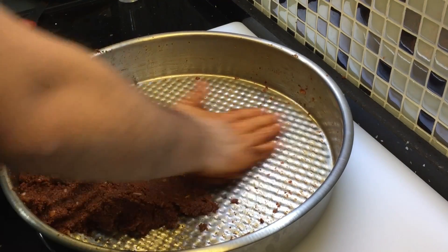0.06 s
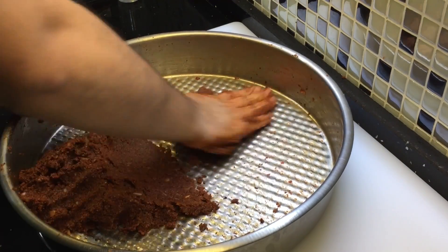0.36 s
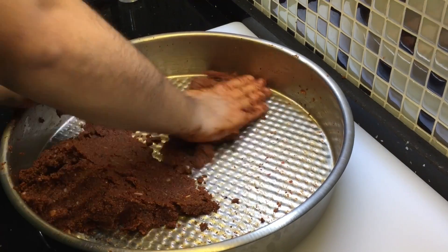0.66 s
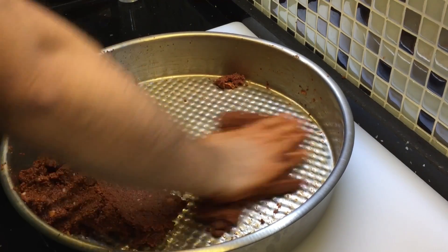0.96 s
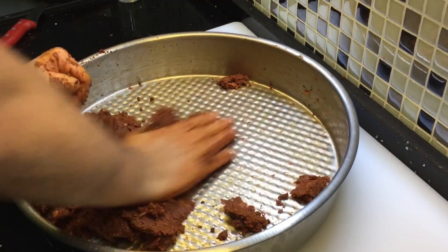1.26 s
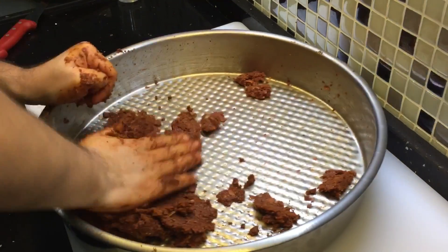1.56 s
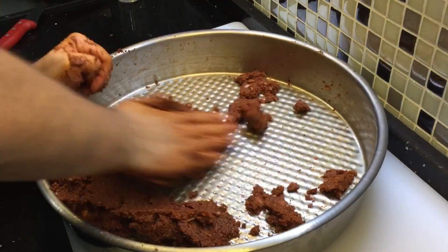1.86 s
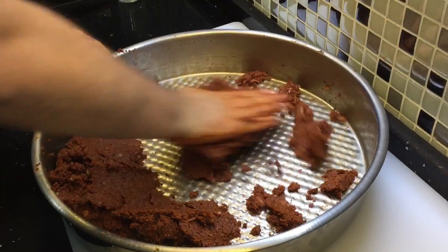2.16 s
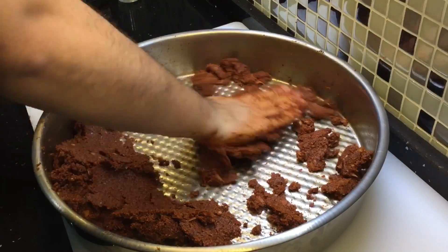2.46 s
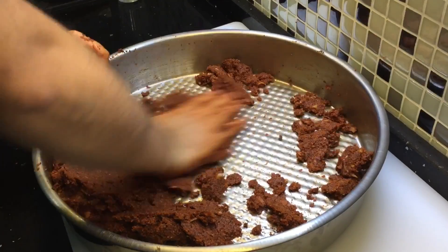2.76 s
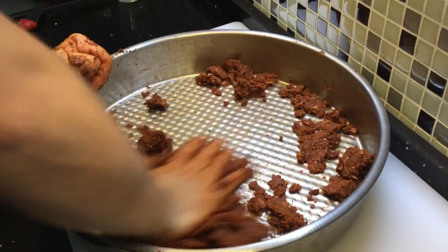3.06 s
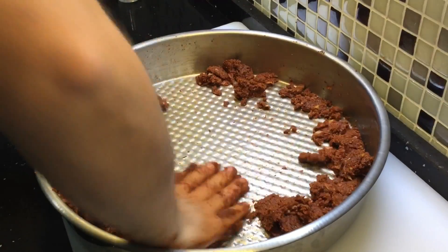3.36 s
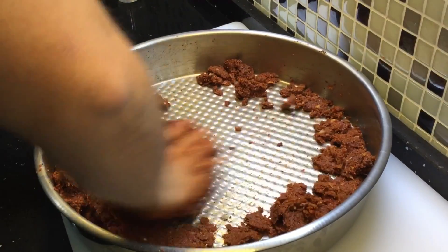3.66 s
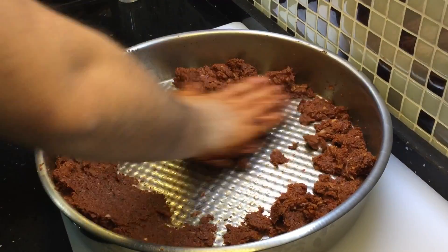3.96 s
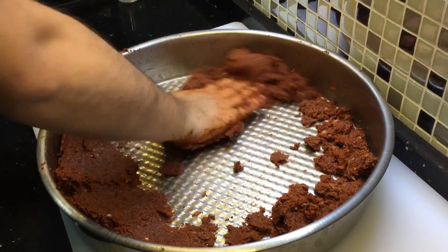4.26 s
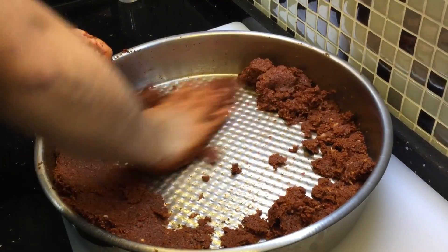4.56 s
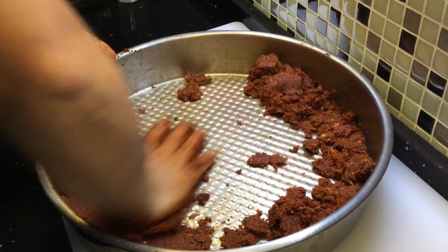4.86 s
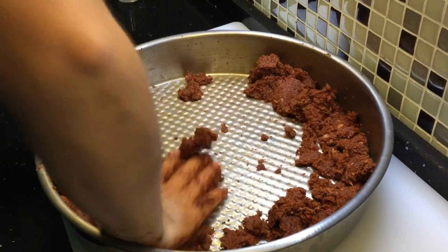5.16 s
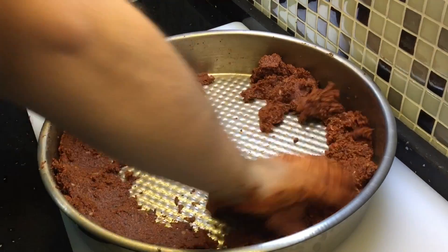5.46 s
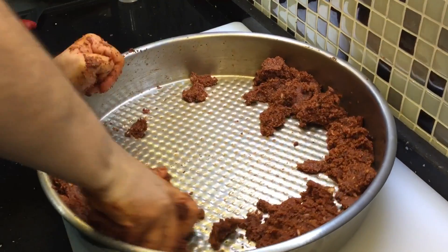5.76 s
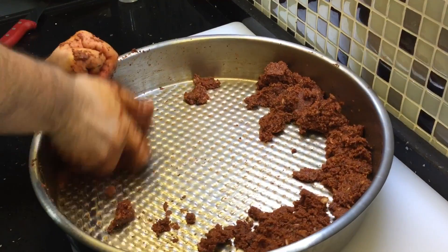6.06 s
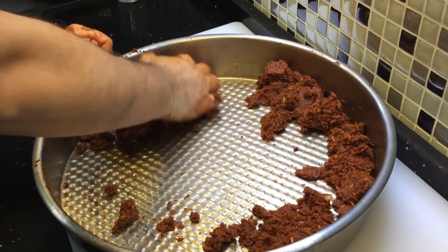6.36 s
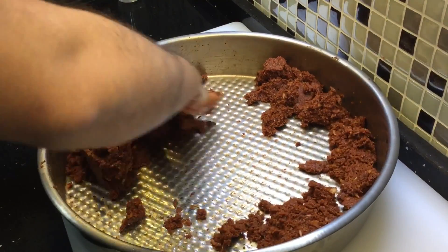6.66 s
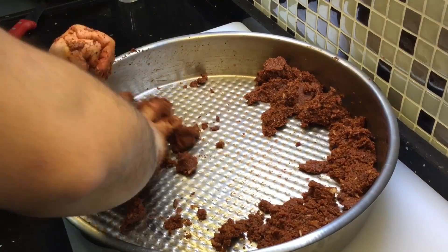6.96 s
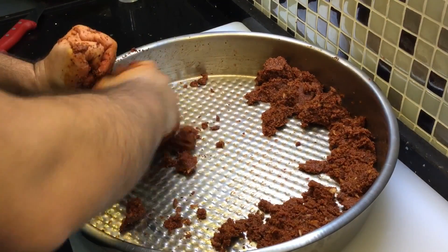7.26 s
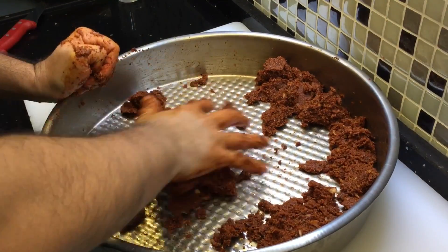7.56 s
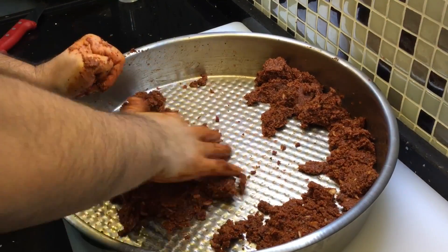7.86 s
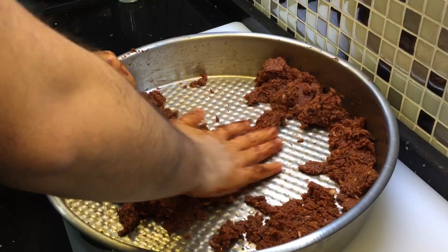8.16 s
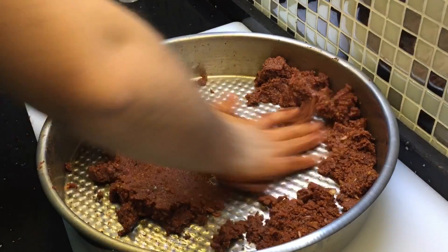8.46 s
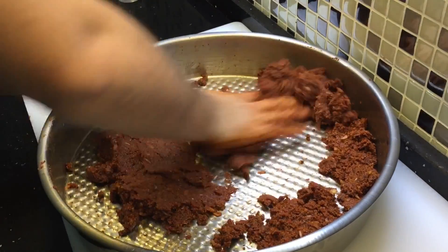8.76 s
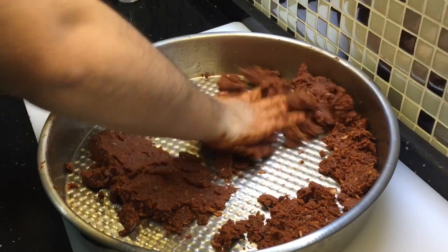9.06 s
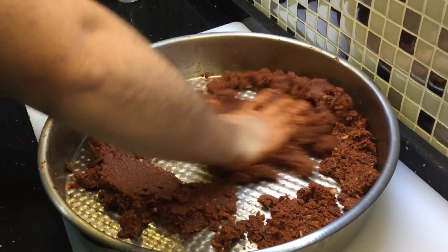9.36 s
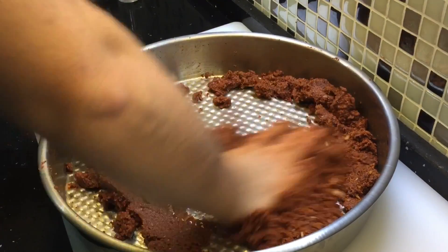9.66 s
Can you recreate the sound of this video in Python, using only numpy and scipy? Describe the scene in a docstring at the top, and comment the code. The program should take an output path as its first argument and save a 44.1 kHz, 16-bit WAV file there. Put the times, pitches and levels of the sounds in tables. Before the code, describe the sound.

A hand sweeps and presses a damp grain mixture around a metal pan, with gritty rubbing, dull thumps and moist smacks.

```python
"""A tiled kitchen, one microphone close to a wide, embossed metal pan on the counter.
A bare hand sweeps and presses a damp grain mixture round it: grains rasp and hiss over the dimples,
crumbs tick, and the pan floor drums under the palm. The hand lands with dull thumps; damp skin and
lumps smack and judder on the metal. Past the middle the sweeps turn light for a few seconds.
Behind the pan are a short ring off the tiles and faint room tone."""
import sys
import numpy as np
from scipy import signal
from scipy.fft import rfft, irfft, next_fast_len
from scipy.io import wavfile
from scipy.ndimage import uniform_filter1d

SR = 44100
rng = np.random.default_rng(int(sys.argv[2]) if len(sys.argv) > 2 else 0)


def inscribe(sig):
    """Save sig as 16-bit PCM at rate SR to the path in sys.argv[1].

    A 1-D sig is mono; a 2-D sig holds one channel per row.
    Samples are clipped to [-1, 1] before scaling.
    """
    pcm = np.round(np.clip(np.atleast_2d(sig).T, -1, 1) * 32767)
    wavfile.write(sys.argv[1], SR, pcm.astype(np.int16))


N = 427769
TIME = np.arange(N) / SR

# Event levels are ahead of each layer's own trim.
# sweeps of the hand: top speed t/s, rise/s, fall/s, rasp/dB, body/dB re rasp, hiss/dB re rasp,
# drumming/dB, rocking/dB, floor resonance under the palm f/Hz
SWEEPS = [(.002, .05, 0.038, -34.5, -11, -8.5, -40, -58, 114),
          (.07, 0.049, .08, -47.5, 1, -3, -46, -48, 112), (.325, 0.089, 0.14, -49, 1, 1, -47, -60, 120),
          (.44, 0.032, 0.041, -50, 4.5, 1.5, -55, -60, 123),
          (.667, .13, 0.22, -47, 0.5, -0.5, -44, -42.5, 126),
          (.81, 0.076, 0.12, -47.5, 2.5, -10, -39, -51, 127),
          (1.022, 0.18, 0.18, -46.5, 3, -2, -45.5, -41, 125),
          (1.368, 0.16, 0.17, -47.5, 4, -2, -47, -55, 119),
          (1.51, 0.076, 0.098, -50, 7, -11, -32.5, -48, 151),
          (1.763, 0.12, 0.15, -43.5, 4, -3.5, -44, -49, 130),
          (2.13, 0.15, 0.15, -45, 3, -2.5, -50, -45.5, 140),
          (2.48, 0.25, 0.13, -46.5, 3, -2, -43, -62, 125), (2.829, 0.19, .15, -45.5, 3, -2, -46, -53, 132),
          (3.193, 0.093, .11, -47.5, 2, -1, -47, -45, 142), (3.4, .06, .07, -61, -2, 3, -56, -55, 149),
          (3.546, 0.12, 0.15, -47.5, 1, -0.5, -55, -45, 147),
          (3.88, 0.11, 0.13, -45, 2, -1.5, -39, -45, 153),
          (4.245, 0.18, .125, -45.5, 5, -1.5, -43.5, -43.5, 152),
          (4.43, .06, 0.12, -53, 7, -1, -59, -58, 135), (4.594, 0.11, 0.13, -44.5, 5, -1.5, -42, -51, 121),
          (4.968, 0.17, 0.097, -46, 4.5, -1, -39.5, -47, 128),
          (5.33, 0.15, 0.11, -47.5, 6, -1, -47, -60, 135),
          (5.583, 0.095, 0.22, -58, -17, -7, -50, -60, 147), (5.84, .09, .09, -66, 5, -8, -45, -58, 161),
          (6.125, 0.12, 0.14, -58.5, 2.5, -7, -41.5, -67, 140),
          (6.271, 0.07, 0.062, -53.5, 13.5, 0, -42, -55, 185),
          (6.55, 0.085, 0.073, -56, 6.5, -19, -55, -56, 170),
          (7.097, 0.088, 0.18, -58, 3.5, -4, -76, -72, 162),
          (7.24, 0.064, .055, -58, -23, 1, -75, -77, 173),
          (7.515, 0.057, .135, -61, -11, -0.5, -54.5, -67, 155),
          (7.687, .06, .135, -56, 1.5, -2, -62, -57, 146),
          (7.815, .04, 0.071, -52.5, 5, 8.5, -61, -68, 138), (8.07, .03, 0.052, -70, 8, 3, -66, -70, 140),
          (8.168, 0.028, 0.029, -65.5, 8, 7.5, -66, -70, 150),
          (8.348, 0.081, 0.11, -47.5, 2.5, -0.5, -61, -39.5, 170),
          (8.478, 0.058, 0.063, -52.5, -10, 2.5, -54, -60, 160),
          (8.69, 0.1, 0.18, -47.5, 1, -1, -52, -43.5, 130),
          (9.024, 0.15, 0.13, -48, 2, -0.5, -49, -47, 135),
          (9.24, 0.081, 0.098, -59.5, -1, 4, -57, -49.5, 125),
          (9.358, 0.079, 0.15, -46, 4, -2, -47.5, -57, 129), (9.7, 0.12, .1, -46.5, 7, -3, -52, -59, 165)]
# light contact under and between the sweeps: t/s, rasp/dB, hiss/dB re rasp
LIGHT_CONTACT = [(0, -47.5, -11), (.2, -59, -14), (.53, -65, -10), (.8, -57.5, -3), (1.6, -54, -2.5),
                 (1.95, -62, -6), (2.62, -62, -4), (3.0, -53.5, -3), (3.7, -56.5, -4), (4.05, -59, -7),
                 (5.1, -54.5, -2), (5.8, -63, -2.5), (6.5, -59.5, 0), (6.8, -64, -6), (7.35, -73.5, 3.5),
                 (8.0, -72, -3.5), (8.6, -54.5, -12), (9.55, -71, -2)]
# the wall sings as the hand nears the rim: t/s, level/dB re rasp
RIM_SINGING = [(0, -22), (.7, -10), (1.1, -7), (1.8, -2.5), (2.4, -16), (2.9, -4), (3.4, -11), (4.0, -21),
               (5.2, -15), (6.0, -11), (9.7, -27)]
# the hand lands: t/s, level/dB, rocking/dB, hardness/dB, factor on the ringing time
LANDINGS = [(0.286, -31.5, -12, -12, 0.77), (0.461, -25.5, -24, -49, 0.62), (0.556, -32.5, -21, -8, 0.58),
            (0.742, -34, -12, -9, 1), (0.931, -31.5, -14, -21, 0.87), (0.999, -34, -21, -17, 0.62),
            (1.256, -22, -8, -14, 0.72), (1.483, -33, -32, -20, 1), (1.633, -25, -3, -12.5, 0.61),
            (2.352, -21, 0, -1, 0.51), (2.715, -26, -11, -10.5, 0.97), (3.074, -16, -32, -7, 0.77),
            (3.449, -30, -4, -8, 0.73), (3.729, -31.5, -11, -37, 0.87), (4.124, -25.5, -20, -15.5, 1),
            (4.464, -27.5, -8, -21, 1), (4.849, -28.5, -12, -14, 0.65), (5.208, -27.5, -4, -9.5, 0.55),
            (5.902, -35.5, -26, 8, 0.48), (6.284, -36, -17, -6.5, 1), (6.463, -35, -30, 13, 0.93),
            (7.137, -42.5, -24, 7, 0.99), (8.071, -34.5, 0, -0.5, 0.75), (8.29, -23, -11, -1, .95),
            (8.611, -30.5, -3, -28, 0.55), (8.931, -20.5, -9, -9, 0.67), (9.263, -34, 2, -11, 0.43),
            (9.593, -33, -11, -6.5, 0.85)]
# hand and lumps hit the metal: t/s, slap/dB, snap/dB, slap t60/s
SMACKS = [(0.269, -31.5, -59, 0.21), (0.46, -26, -34.5, 0.062), (0.767, -31.5, -50, 0.13),
          (1.125, -41, -34, 0.063), (1.252, -25, -30.5, 0.064), (1.626, -31.5, -42, 0.087),
          (1.768, -24.5, -50, 0.1), (2.352, -19, -27, 0.034), (2.710, -21, -51, 0.11),
          (4.114, -29.5, -34.5, 0.14), (4.126, -22, -39, 0.082), (4.391, -32, -55, 0.048),
          (4.449, -22, -29.5, 0.18), (4.848, -25, -53, 0.079), (5.665, -26.5, -37, 0.059),
          (6.053, -36, -61, 0.18), (6.294, -36, -46, 0.052), (6.422, -37, -36, 0.19),
          (6.473, -49, -40, 0.1), (6.573, -43, -43, 0.085), (6.717, -36, -62, 0.068),
          (7.138, -28, -47, 0.04), (7.492, -34, -40.5, 0.092), (7.572, -35.5, -57, 0.045),
          (8.07, -37.5, -61, 0.05), (8.291, -21, -36, 0.045), (8.609, -33, -48, 0.085),
          (8.927, -22.5, -44, 0.055), (9.584, -29, -55, 0.14)]
# skin or a lump catches on the metal: middle t/s, length/s, f/Hz, level/dB
CATCHES = [(.02, 0.093, 3400, -45), (.03, 0.065, 310, -44), (1.783, 0.072, 706, -38),
           (1.814, 0.078, 1530, -45), (2.361, 0.029, 336, -24.5), (2.492, 0.045, 405, -37.5),
           (3.093, 0.038, 500, -37.5), (3.327, .16, 1700, -56), (3.64, 0.023, 2800, -48),
           (3.917, 0.095, 526, -42), (4.811, .025, 9100, -48), (5.013, .06, 640, -46),
           (5.433, 0.017, 2240, -50), (5.623, 0.28, 4530, -55.5), (5.671, 0.018, 1110, -41.5),
           (6.23, 0.053, 520, -48), (6.289, 0.11, 204, -40), (6.428, 0.1, 4300, -50),
           (6.62, 0.05, 192, -44.5), (6.836, .05, 134, -45), (7.1, 0.099, 990, -56),
           (7.142, 0.028, 605, -47), (7.507, 0.047, 1200, -48), (7.584, 0.041, 1040, -49),
           (8.058, .025, 4140, -58), (8.935, 0.03, 313, -34.5), (8.515, 0.086, 990, -50),
           (9.046, 0.082, 484, -49)]

# modes of the pan, before the hand loads or damps them: f/Hz, level/dB, t60/s
FLOOR_MODES = [(103, -2, 0.14), (125.2, 8, 0.2), (167.4, 5, 0.15), (197.7, 1, 0.17), (237, -22, 0.13),
               (306, -12, 0.051), (351, -17, 0.061)]  # the floor under the mixture
WALL_MODES = [(537, -25.5, 0.14), (563, -9.5, 0.09), (625, 13, 0.028), (774, -4, 0.059), (968.5, 10, 0.053),
              (1081, -7, 0.046), (1330, -45, 0.043), (1563, 2.5, 0.07), (1710, 1.5, 0.071),
              (3435, 8.5, 0.073), (3680, -3, .06), (4630, -5, .02)]  # sheet and wall
ROCK_MODES = [(58.6, -36, 0.21), (69.2, -10, 0.36), (84, -33, 0.076)]  # the whole pan rocking

# spectra: f/Hz, level/dB
BODY_SPECTRUM = [(120, -44), (240, -3), (360, 0.5), (440, -5), (620, 1.5), (760, -3.5), (1000, 1),
                 (1250, -0.5), (1450, -8.5), (1750, -3.5), (2100, -16), (5000, -64)]  # grains pressed into the metal
RASP_SPECTRUM = [(400, -18), (1200, -5.5), (1700, 0.5), (2030, -5), (2400, 0.5), (2900, -2), (3500, -0.5),
                 (4500, 0.5), (5000, -3.5), (5800, -4), (7200, -15), (10000, -19), (16000, -38)]  # grains scraping the dimples
HISS_SPECTRUM = [(2000, -69), (5000, -7), (6800, 1.5), (7700, 3), (8800, 7.5), (9600, 6.5), (10500, 1.5),
                 (11300, 5), (13800, 5), (16000, 2)]  # loose grains
SLAP_SPECTRUM = [(150, -21.5), (300, 0), (600, -2), (1100, 0.5), (1500, -6.5), (2500, -15), (4300, -18),
                 (7000, -32), (16000, -33)]  # a lump flattening
SNAP_SPECTRUM = [(500, -6), (1500, -1), (2600, 1), (4500, 1), (6500, -7), (9000, -8), (16000, -19)]  # damp skin meeting metal
ROOM_TONE_SPECTRUM = [(25, -19), (55, 3), (170, -6), (260, -11), (600, -21.5), (1200, -25), (2500, -30),
                      (8000, -86), (16000, -25.5)]  # the still kitchen

# decay of the kitchen's reflections: f/Hz, t60/s
KITCHEN_DECAY = [(100, 0.66), (500, 0.44), (3000, 0.17), (14000, 0.11)]


def rubbing(rasp_db, body_db, hiss_db, rim_hz=1710):
    """Grains slip over the dimples in clumps; pressure couples them to the metal, loose ones hiss."""
    clumps, sticking = wander(rate_hz=24), wander(rate_hz=8.3)
    coarse, fine = slips(per_s=2500, spread_db=1), slips(per_s=9000, spread_db=-2)
    body = colour(pan_wall(coarse * gain_of(2 * sticking + clumps), ring_db=-21.5), BODY_SPECTRUM)
    scraping = (fine + 0.38 * coarse) * gain_of(1.3 * clumps)
    rasp = colour(pan_wall(scraping, ring_db=-18.5), RASP_SPECTRUM)
    loose = fine + slips(per_s=13000, spread_db=1.5)
    hiss = colour(loose * gain_of(1.03 * clumps), HISS_SPECTRUM)
    body = hand_damping(body, depth_db=3.2, across_hz=170, lasting_s=0.07) * gain_of(body_db - 1.96)
    rasp = hand_damping(rasp, depth_db=2.6, across_hz=300, lasting_s=0.05) * gain_of(rasp_db + 0.77)
    hiss = hand_damping(hiss, depth_db=2.3, across_hz=400, lasting_s=0.04) * gain_of(hiss_db + 1.9)
    rim_db = rasp_db + np.interp(TIME, *np.transpose(RIM_SINGING))
    rim = unit_rms(resonate(coarse, rim_hz, width_hz=170)) * gain_of(rim_db)
    return hand_lift() * (body + rasp + hiss + rim)


def hand_levels(arch_drop_db=21.5, arch_flatness=2.64):
    """Sweeps swell and fade with the hand's speed: rasp, body, hiss, drumming and rocking in dB."""
    t = TIME[::64]
    when, *columns = np.transpose(LIGHT_CONTACT)
    light_db, loose_db = (np.interp(t, when, column) for column in columns)
    power = gain_of([light_db + offset_db for offset_db in (0, 7, loose_db, 6, -5)]) ** 2
    for s, rise, fall, rasp_db, body_db, hiss_db, drum_db, rock_db, _ in SWEEPS:
        from_top = np.minimum(abs(t - s) / np.where(t < s, rise, fall), 3)
        top_db = np.array([rasp_db, rasp_db + body_db, rasp_db + hiss_db, drum_db, rock_db])[:, None]
        power += gain_of(top_db - arch_drop_db * from_top ** arch_flatness) ** 2
    return [np.interp(TIME, t, 10 * np.log10(layer)) for layer in power]


def hand_damping(x, depth_db, across_hz, lasting_s):
    """The moving hand damps and frees parts of the pan, so resonances come and go."""
    spectra = signal.stft(x, SR, nperseg=1024, noverlap=768)[2]
    bins, frames = round(across_hz * 1024 / SR), round(lasting_s * SR / 256)
    patches = uniform_filter1d(rng.standard_normal(spectra.shape), bins, axis=0)
    patches = unit_rms(uniform_filter1d(patches, frames, axis=1))
    spectra *= gain_of(depth_db * patches)
    return unit_rms(signal.istft(spectra, SR, nperseg=1024, noverlap=768)[1][:N])


def hand_lift(dip_db=2.5, lift_s=0.035):
    """Just before each smack the hand leaves the metal, so the rubbing's gain dips."""
    lifted = np.zeros(N)
    for s, *_ in SMACKS:
        corners = [s - lift_s, s - lift_s / 3, s - 0.003, s]
        lifted = np.maximum(lifted, np.interp(TIME, corners, [0, 1, 1, 0]))
    return gain_of(-dip_db * lifted)


def pan_wall(x, ring_db):
    """A contact reaches the microphone directly and through the ringing sheet metal."""
    sheet = ring(WALL_MODES).sum(0)
    return x + gain_of(ring_db) * signal.oaconvolve(x, sheet / np.linalg.norm(sheet))[:len(x)]


def thumps(contact_s=0.0035, rise_s=0.0066, loaded_pitch=0.96):
    """A soft blow swings the pan floor; a heavy one rocks the pan, a hard one wakes higher modes."""
    out, t = np.zeros(N), np.arange(SR // 2) / SR
    modes = np.array(ROCK_MODES + FLOOR_MODES)
    palm = np.hanning(round(contact_s * SR))  # the flesh spreads the blow
    for s, db, rock_db, hard_db, t60_factor in LANDINGS:
        blow = [(75, rock_db + 16), (120, 0), (185, hard_db + 12.5), (340, 0.63 * hard_db + 20.5)]
        weights = gain_of(value_at(blow, modes[:, 0]))
        ringing = ring(modes * [loaded_pitch, 1, t60_factor])  # the hand's weight lowers the pitch
        swing = -weights @ ringing * (1 - np.exp(-t / rise_s))
        swing = signal.oaconvolve(swing, palm)
        add(out, s, gain_of(db + 5) * swing / abs(swing).max())
    return out


def smacks(snap_t60=0.054, touch_s=0.0028, spread_s=0.001):
    """Damp skin snaps at first touch while the lump flattens with a duller burst of grains."""
    out, t = np.zeros(N), np.arange(SR // 4) / SR
    for s, slap_db, snap_db, slap_t60 in SMACKS:
        squash, wet = rng.standard_normal((2, len(t)))
        squash = squash * gain_of(-60 * t / slap_t60) * (1 - np.exp(-t / spread_s))
        slap = colour(pan_wall(squash, ring_db=-14.5), SLAP_SPECTRUM)
        snap_envelope = gain_of(-60 * t / snap_t60) * np.minimum(t / touch_s, 1)
        snap = unit_rms(colour(wet, SNAP_SPECTRUM)) * snap_envelope
        add(out, s, gain_of(slap_db - 3.5) * slap / abs(slap).max() + gain_of(snap_db - 4) * snap)
    return out


def drumming(drum_db, rock_db, t60_factor=0.6):
    """The palm sticks and slips on the embossed floor, which it damps, and rocks the pan."""
    sweep_s, *_, sweep_hz = np.transpose(SWEEPS)
    floor_hz = np.interp(TIME, sweep_s, sweep_hz)
    palm = slips(per_s=400, spread_db=0) * gain_of(2 * wander(rate_hz=16))
    floor, rock = (signal.oaconvolve(palm, ring(np.multiply(modes, [1, 1, t60_factor])).sum(0))[:N]
                   for modes in (FLOOR_MODES, ROCK_MODES))
    floor = unit_rms(resonate(floor, floor_hz, width_hz=167))
    floor += 0.5 * unit_rms(resonate(palm, floor_hz, width_hz=115))
    return unit_rms(floor) * gain_of(drum_db + 2.5) + unit_rms(rock) * gain_of(rock_db + 2)


def catches():
    """Brief runs of slips swell and fade in one resonance: hollow grunts low, wet squelches high."""
    out, friction = np.zeros(N), slips(per_s=3000, spread_db=-3.5)
    for s, length, hz, db in CATCHES:
        start, swell = max(s - length / 2, 0), np.hanning(round(length * SR))
        run = friction[round(start * SR):][:len(swell)]
        judder = resonate(run, hz, width_hz=198 * (hz / 1000) ** 0.68)
        add(out, start, gain_of(db - 4) * unit_rms(judder * swell))
    return out


def crumbs(rasp_db, per_s=60, below_rasp_db=13.5, decay_cycles=14):
    """Hard crumbs crack or flick off the dimples, each with its own brief note."""
    ticks, t = np.zeros(N), np.arange(SR // 25) / SR
    for when, smallness, force in rng.random((round(per_s * N / SR), 3)):
        hz = 2200 * 5 ** smallness
        note = np.sin(2 * np.pi * hz * t) * np.exp(-t * hz / decay_cycles)
        add(ticks, when * N / SR, (0.82 + force) * note)
    return unit_rms(ticks) * gain_of(rasp_db - below_rasp_db)


def kitchen_reflections(x, per_s=3000):
    """Tiles and counter reflect the pan, treble dying first; it radiates little bass that far."""
    echoes = rng.standard_normal(SR // 2) * (rng.random(SR // 2) < per_s / SR)
    echoes[:SR // 300] = 0  # the direct sound reaches the microphone first
    hz, t, spectra = signal.stft(echoes, SR, nperseg=256)
    decay = gain_of(-60 * t / value_at(KITCHEN_DECAY, hz)[:, None])
    tail = signal.istft(spectra * decay, SR, nperseg=256)[1]
    tail = signal.sosfilt(signal.butter(2, 260, "highpass", fs=SR, output="sos"), tail)
    return signal.oaconvolve(x, tail / np.linalg.norm(tail))[:N]


def room_tone(level_db=-60.5):
    """The still air of the kitchen: faint steady noise, mostly bass."""
    return gain_of(level_db) * unit_rms(colour(rng.standard_normal(N), ROOM_TONE_SPECTRUM))


def slips(per_s, spread_db):
    """Clicks at random moments; positive spread makes a few louder, negative a few softer."""
    size, sign, chance = rng.exponential(1, N), rng.choice([-1., 1.], N), rng.random(N)
    return unit_rms((chance < per_s / SR) * sign * gain_of(spread_db * np.minimum(size, 5)))


def wander(rate_hz):
    """Smooth random drift of rms 1, rolling off above rate_hz."""
    size = next_fast_len(N, True)
    hz = np.fft.rfftfreq(size, 1 / SR)
    spectrum = rfft(rng.standard_normal(N), size) / (1 + (hz / rate_hz) ** 4)
    return unit_rms(irfft(spectrum, size)[:N])


def ring(modes):
    """Each mode's dying sine after a blow, one row a mode."""
    hz, db, t60 = np.transpose(modes)[:, :, None]
    t = np.arange(SR // 2) / SR
    return gain_of(db - 60 * t / t60) * np.sin(2 * np.pi * hz * t)


def resonate(x, hz, width_hz):
    """A steep resonance, fixed or moving: shift hz down to zero, smooth twice, shift back."""
    carrier = np.exp(2j * np.pi * np.cumsum(hz * np.ones(len(x))) / SR)
    pole = np.exp(-np.pi * width_hz / SR)
    return (carrier * signal.lfilter([(1 - pole) ** 2], [1, -2 * pole, pole ** 2], x / carrier)).real


def colour(x, spectrum, size=4096):
    """Causal filter with the given spectrum, so that clicks keep their sharp fronts."""
    log_gain = np.log(gain_of(value_at(spectrum, abs(np.fft.fftfreq(size, 1 / SR)))))
    taps = np.fft.ifft(np.exp(np.conj(signal.hilbert(log_gain)))).real
    return signal.oaconvolve(x, taps[:size // 2])[:len(x)]


def value_at(points, hz):
    """Reads a curve on a log-frequency axis."""
    f, value = np.transpose(points)
    return np.interp(np.log(hz + 1), np.log(f + 1), value)


def add(mix, s, sound):
    """Mixes a sound in at s seconds."""
    part = mix[round(s * SR):][:len(sound)]
    part += sound[:len(part)]


def gain_of(db):
    """Decibels to amplitude."""
    return 10 ** (np.asarray(db) / 20)


def unit_rms(x):
    """Scales to an rms of 1."""
    return x / np.sqrt(np.mean(x ** 2) + 1e-20)


def scene():
    """The pan close to the microphone, the tiles further off, room tone behind; mono."""
    rasp_db, body_db, hiss_db, drum_db, rock_db = hand_levels()
    pan = rubbing(rasp_db, body_db, hiss_db) + crumbs(rasp_db)
    pan += smacks() + catches() + thumps() + drumming(drum_db, rock_db)
    return (pan + room_tone() + gain_of(-13.5) * kitchen_reflections(pan))[None]


def record(dry):
    """The microphone sheds the bass below 46 Hz; the band ends at 15.9 kHz."""
    thinned = signal.sosfilt(signal.butter(5, 46, "highpass", fs=SR, output="sos"), dry)
    band_limit = signal.firwin(511, 15900, window=("kaiser", 9), fs=SR)
    return signal.oaconvolve(thinned, band_limit[None], "same")


dry = scene()
out = record(dry)
inscribe(out)
```